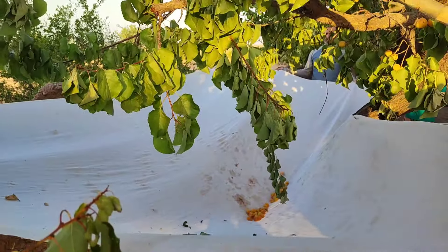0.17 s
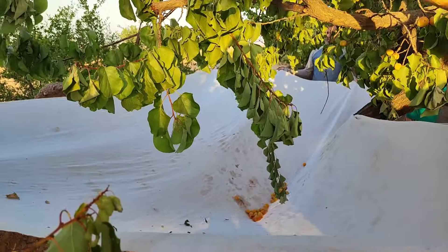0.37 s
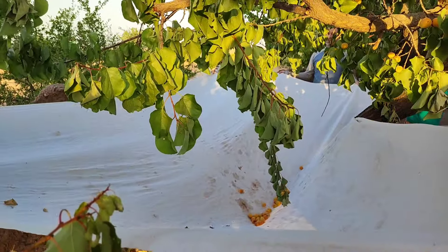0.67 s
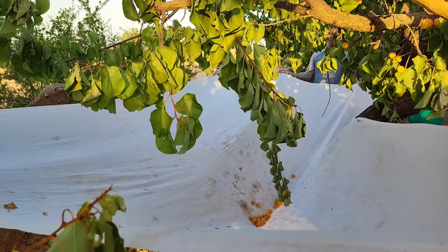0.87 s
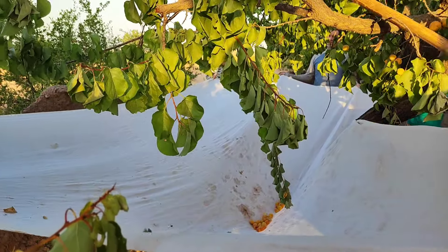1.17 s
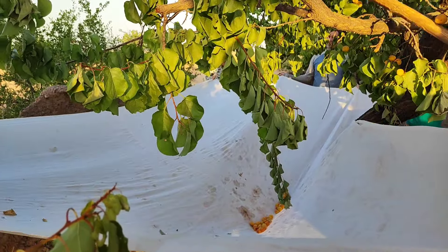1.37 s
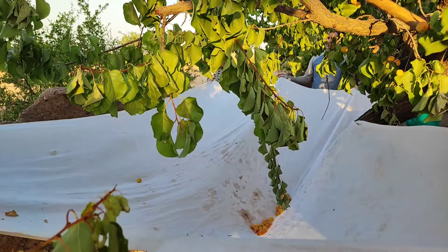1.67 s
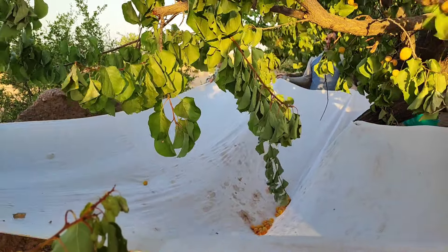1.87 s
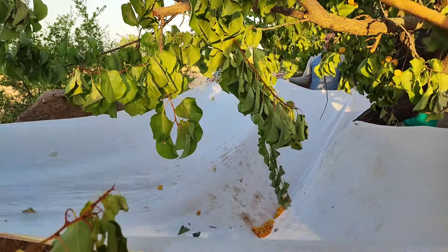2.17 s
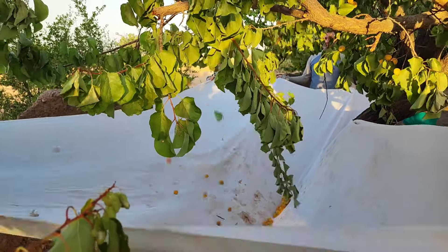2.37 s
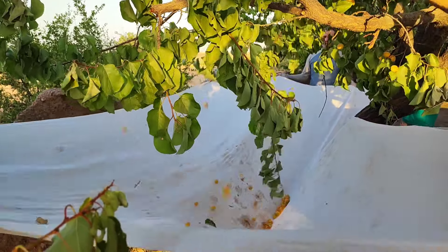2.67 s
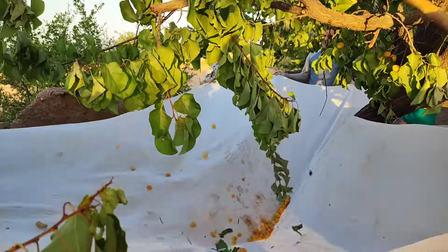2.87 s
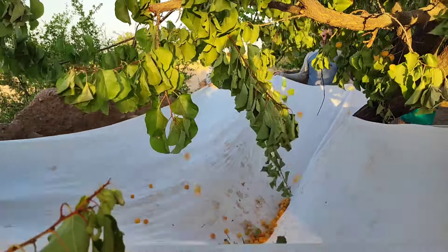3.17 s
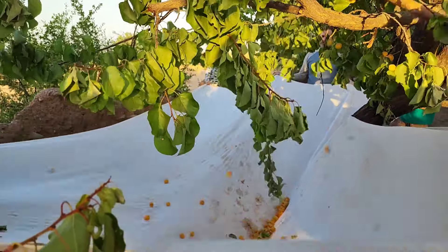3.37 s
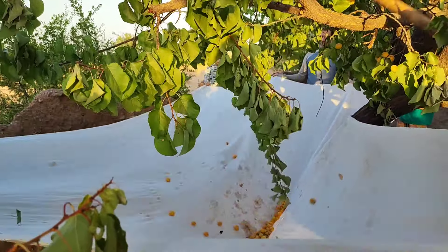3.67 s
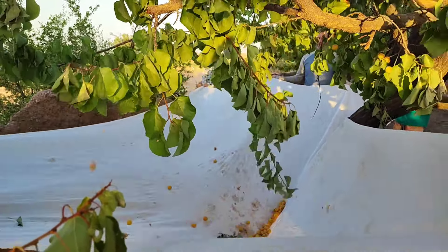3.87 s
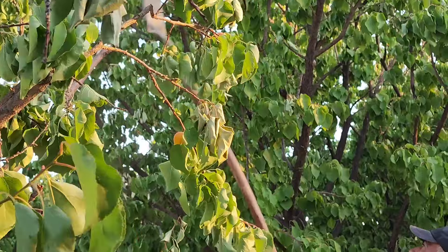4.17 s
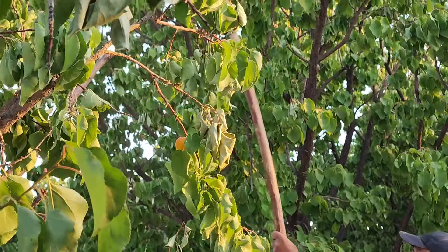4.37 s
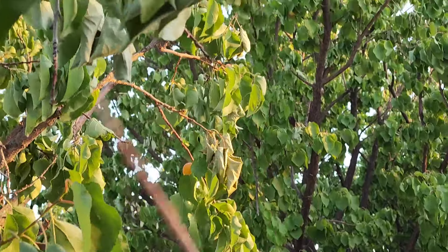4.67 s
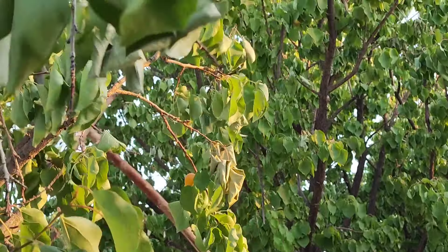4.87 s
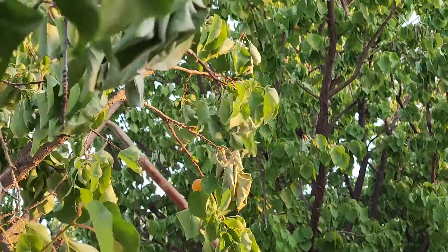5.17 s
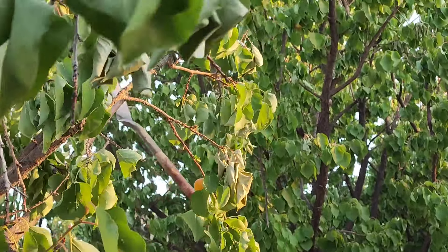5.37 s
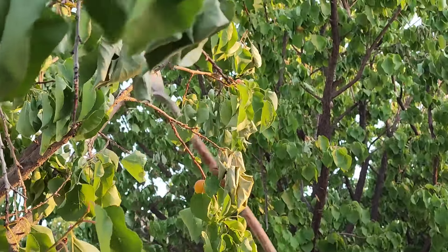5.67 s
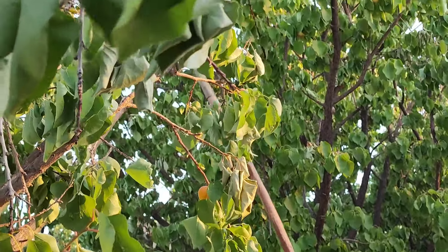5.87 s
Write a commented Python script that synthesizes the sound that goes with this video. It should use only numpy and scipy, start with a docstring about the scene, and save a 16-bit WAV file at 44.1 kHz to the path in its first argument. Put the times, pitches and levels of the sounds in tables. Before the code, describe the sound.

A quiet orchard with a faint far hush and settling leaves, heard from beneath a tree. In the first 0.9 s a small twig snap and a few soft fruit pats land on slack plastic. Around 1.0 s a metal-tipped pole taps lightly twice; a moderate crack comes at 1.8 s, then a quick cluster of light ringing taps from 2.0 to 2.35 s. Hard double knocks, bright crack and dull woody thud with short metallic ring, follow at 2.6, 3.0, 3.4 and 3.75 s, leaves hissing, twigs snapping, fruit pattering. A tiny silence falls at 3.9 s. Then, close among leaves, a sharp twig snap and hollow case bump at 4.2 s, faint fruit pats near 4.5 s and one heavy, strongly ringing knock at 4.8 s. A dry snap follows at 5.0 s; rustle fades while low wind thumps, mostly left, peak around 5.3 and 5.6 s.

```python
"""An orchard in a light wind: fruit is knocked from a tree with a long metal-tipped pole.
Each blow grazes the twigs, cracks on a branch and knocks home; between blows the pole taps lightly.
Contacts are bursts of coloured noise with decaying sine modes for the pole. Every one shakes the leaves,
a hiss with ticks; twigs snap and fruit pats on a plastic sheet, both as short noise bursts.
After a short silence the microphone is up among the leaves, where it is bumped and catches the wind."""
import sys
import numpy as np
from scipy import signal
from scipy.fft import rfft, irfft
from scipy.io import wavfile

SR = 44100
rng = np.random.default_rng(int(sys.argv[2]) if len(sys.argv) > 2 else 0)


def generate_wav(sig):
    """Save sig (samples, or channels by samples) to the path in sys.argv[1] as 16-bit PCM at SR."""
    pcm = np.round(np.clip(np.atleast_2d(sig).T, -1, 1) * 32767).astype(np.int16)
    wavfile.write(sys.argv[1], SR, pcm)


N = 266011
TIME, HZ = np.arange(N) / SR, np.fft.rfftfreq(N, 1 / SR)
# below the tree until the silence starts, up in the crown once it ends
SILENCE_START_S, SILENCE_END_S = 3.893, 3.94

# Full blows of the pole on a branch:
# [crack t/s, graze lead/s, knock delay/s, crack level/dB, chatter t60/s, knock level/dB, ring level/dB,
#  mode favoured by the point of contact f/Hz, its boost/dB, leaves level/dB]
FULL_BLOWS = [(1.779, 0.021, 0.012, -18, 0.035, -20, -36, 810, 15.5, -36),
              (2.602, .017, .023, -15, 0.22, -11.5, -25.5, 1480, 2, -25),
              (2.9974, 0.0055, 0.011, -5, 0.062, -9, -25, 1147, 6.5, -26.5),
              (3.376, 0.005, 0.011, -6, 0.045, -9.5, -29.5, 1597, 15, -27),
              (3.763, 0.000896, .0112, -9, 0.067, -10, -23.5, 1746, 1.5, -29),
              (4.7958, 0.00073, 0.015, -16.5, 0.36, -8, -29, 1890, 37, -22.5)]
# Light taps of the pole: [t/s, crack level/dB, ring level/dB, favoured mode f/Hz, its boost/dB]
LIGHT_TAPS = [(-.25, -45, -37, 1510, 10.5), (0.9682, -22, -30, 2648, 16), (1.023, -28, -34, 1510, 1),
              (1.964, -28, -39, 1650, 16.5), (2.048, -32.5, -36.5, 800, 12.5),
              (2.0584, -26, -29.5, 1653, 18), (2.1422, -25.5, -25, 1650, 19), (2.205, -20.5, -42, 1700, 13),
              (2.222, -16.5, -28.5, 1600, 6), (2.238, -21, -38.5, 1690, 12),
              (2.3443, -26.5, -32.5, 2700, 1)]
REBOUND_DB, REBOUND_T60_S = -9.5, 0.12  # second crack as the pole knocks home, against the first
CRACK_BODY_DB, CRACK_BODY_T60_S = -12.5, 0.079  # dull share of a blow's crack, against its bright part
CRACK_RING_DB = -0.5  # ring of the crack, against that of the knock
KNOCK_T60_S = 0.072
TAP_BODY_DB, TAP_T60_S = -13, 0.13  # dull share of a tap, against its crack; decay of both
TAP_FREE_DB = 2  # a tap leaves the pole free, so its low modes ring more than under a full blow


def pole():
    """A blow grazes the twigs, cracks on the bark and a moment later knocks home; a tap only cracks and rings."""
    out = np.zeros((2, N))
    for s, lead, delay, crack_db, chatter, knock_db, ring_db, favoured_hz, boost_db, _ in FULL_BLOWS:
        add(out, s - lead, graze(crack_db))
        add(out, *contact(s, crack_db, chatter, crack_db + CRACK_BODY_DB, CRACK_BODY_T60_S,
                          ring_db + CRACK_RING_DB, favoured_hz, boost_db))
        add(out, *contact(s + delay, crack_db + REBOUND_DB, REBOUND_T60_S, knock_db, KNOCK_T60_S,
                          ring_db, favoured_hz, boost_db))
    for s, crack_db, ring_db, favoured_hz, boost_db in LIGHT_TAPS:
        add(out, *contact(s, crack_db, TAP_T60_S, crack_db + TAP_BODY_DB, TAP_T60_S,
                          ring_db, favoured_hz, boost_db, TAP_FREE_DB))
    return out


# Spectrum of the bright crack on bark: [f/Hz, relative level/dB per Hz]
CRACK_SPECTRUM = [(300, -44), (900, -14), (1600, 3.5), (3000, 4), (6000, 1.5), (7300, -10), (9000, -7),
                  (11000, -16), (16000, -15)]
# Spectrum of the dull knock: [f/Hz, relative level/dB per Hz]
KNOCK_SPECTRUM = [(50, -30.5), (180, -6.5), (280, -6.5), (480, -3.5), (630, -10.5), (820, -7), (1400, 0.5),
                  (2500, -10), (6000, -53.5)]


def graze(crack_db, graze_db=-9.5, body_db=-5, t60=0.064, rise=0.003):
    """The pole brushes the twigs: a bright and a dull clatter, set against the level of the crack."""
    bright = burst(spectrum(CRACK_SPECTRUM), t60, rise)
    dull = burst(spectrum(KNOCK_SPECTRUM), t60, rise)
    return amp(crack_db + graze_db) * (bright + amp(body_db) * dull)


def contact(s, crack_db, chatter, knock_db, knock_t60, ring_db, favoured_hz, boost_db, free_db=0, damp_db=6.5):
    """One touch of pole and branch: a bright crack, a dull knock and a ring that later touches damp."""
    # the pole is a little to the right before the silence and to the left after it
    if s < SILENCE_START_S:
        end, lag = SILENCE_START_S, -0.00006
    else:
        end, lag = N / SR, 0.00016
    ring = pole_ring(knock_db + free_db, ring_db, favoured_hz, boost_db, end - s, lag)
    starts = np.sort([row[0] for row in FULL_BLOWS + LIGHT_TAPS])
    later = starts[starts > s + 0.07]
    touches = np.searchsorted(later, s + np.arange(ring.shape[1]) / SR)
    out = ring * amp(-damp_db * touches)
    add(out, 0, amp(crack_db) * burst(spectrum(CRACK_SPECTRUM), chatter, rise=0.00046, lag=lag))
    add(out, 0, amp(knock_db) * burst(spectrum(KNOCK_SPECTRUM), knock_t60, rise=0.00096, lag=lag))
    return s, out


# Modes of the pole: [f/Hz before detuning, relative level/dB, t60/s]
POLE_MODES = [(194, -8.5, 0.13), (410, 2.5, 0.021), (505, 3, 0.064), (735, 0, 0.073), (799, 2.5, 0.12),
              (872, 8.5, 0.041), (1020, -37, 0.025), (1133, -19, 0.73), (1320, -28.5, .08),
              (1510, -3.5, 0.48), (1509, -15.5, 2.2), (1603, -0.5, 0.11), (1659, -11, 0.92),
              (1707.5, 4.5, 0.16), (1690, -39.5, 0.24), (1917, -21.5, 0.75), (1830, -3.5, 0.23),
              (2125, -7, .1), (2370, -10.5, 0.16), (2710, -11, 0.51), (2700, 8.5, 0.04), (3210, -10, 0.15),
              (3470, -27.5, 0.087), (3280, -30, 0.25), (3675, -5.5, 0.25), (4800, -35.5, 0.27),
              (4750, -2.5, 0.16), (5220, 2, 0.11), (5840, -6.5, 0.11), (6100, -31.5, 0.29)]


def pole_ring(knock_db, ring_db, favoured_hz, boost_db, seconds, lag):
    """The pole's modes as decaying sines; the low ones follow the weight of the knock."""
    hz, db, t60 = np.transpose(POLE_MODES)
    heavy = np.clip(read([(600, 0.9), (1450, 0.0062)], hz), 0, 1)
    favour = boost_db * np.exp(-((hz - favoured_hz) / 35) ** 2)
    db = db + heavy * (knock_db - 8.5) + (1 - heavy) * ring_db + favour
    phase = rng.uniform(0, 2 * np.pi, len(hz))
    scatter, grip = rng.standard_normal((2, len(hz)))
    hz = hz * (1 + 0.00073 * grip / t60)  # grip and branch detune the modes that they damp most
    apart = 2 * np.pi * hz * lag + scatter * hz / 3000  # the ports hear high modes out of step
    t = np.arange(int(seconds * SR)) / SR
    out = np.zeros((2, len(t)))
    for f, gain, life, p, d in zip(hz, amp(db), t60, phase, apart):
        u = t[:int(life * SR)]
        both_phases = np.array([[p], [p - d]])
        out[:, :len(u)] += gain * fall(u, life, 0.0012) * np.sin(2 * np.pi * f * u + both_phases)
    return out


# Fruit landing on the sheet at set times: [t/s, level/dB, centre f/Hz]
SET_FRUIT = [(.175, -40.5, 785), (0.279, -40, 490), (0.629, -40, 900), (.941, -36, 614), (2.837, -23, 940),
             (3.22, -34.5, 1120), (3.851, -22.5, 750), (4.446, -37, 1100), (4.517, -42, 700)]
FALL_S = 0.31  # from branch to sheet
FURTHER_FRUIT_PER_S, FURTHER_FRUIT_DB = 6.2, 3.5  # random fruit, against the rustle that loosened it


def fruit(shake, crinkle_db=-13, further_hz=750, pat_t60=0.08):
    """Fruit pats and crinkles the slack sheet; after the first full blow more lands at random, loud as its rustle."""
    out = np.zeros((2, N))
    landings = [(s, amp(db), hz) for s, db, hz in SET_FRUIT]
    for s in chance(FURTHER_FRUIT_PER_S):
        loosened = s - FALL_S
        if FULL_BLOWS[0][0] < loosened and s < SILENCE_START_S:
            landings.append((s, amp(FURTHER_FRUIT_DB) * np.interp(loosened, TIME, shake), further_hz))
    for s, gain, centre_hz in landings:
        add(out, s, gain * burst(lambda hz: hump(hz, centre_hz, 7), pat_t60, rise=0.0018))
        add(out, s, gain * amp(crinkle_db) * burst(spectrum(LEAF_SPECTRUM), pat_t60, rise=0.00084))
    return out


# Twigs snapping and sprigs brushing at set times: [t/s, level/dB, centre f/Hz, t60/s]
SET_TWIGS = [(.1252, -27.5, 2730, 0.018), (.390, -36.5, 3300, .03), (.418, -34, 6500, .048),
             (1.5165, -35, 1900, 0.024), (2.7987, -18.5, 6700, 0.026), (2.836, -23, 5500, .044),
             (4.146, -29.5, 7850, 0.18), (4.2084, -18, 6950, 0.027), (4.649, -33, 5030, .024),
             (4.693, -30.5, 3450, 0.037), (4.9908, -17, 6000, 0.017), (5.608, -29.5, 5940, 0.044),
             (5.919, -34, 4970, .022), (6.003, -38.5, 6200, 0.086)]
FLICKS_PER_S, FLICK_DB = 3.3, 14  # random flicks of stalks and leaves, against the rustle


def twigs(shake, flick_hz=4800, flick_t60=0.025):
    """Dry snaps, the foliage's colour tilted to a pitch; stalks and leaves flick at random, louder in strong rustle."""
    out = np.zeros((2, N))
    snaps = [(s, amp(db), hz, t60) for s, db, hz, t60 in SET_TWIGS]
    for s in chance(FLICKS_PER_S):
        gain = amp(FLICK_DB) * np.interp(s, TIME, shake)
        snaps.append((s, gain, flick_hz * 2 ** rng.uniform(-1, 1), flick_t60))
    for s, gain, centre_hz, t60 in snaps:
        add(out, s, gain * burst(lambda hz: read(LEAF_SPECTRUM, hz) + hump(hz, centre_hz, 8.6), t60, rise=0.00069))
    return out


# Spectrum of the foliage: [f/Hz, relative level/dB per Hz]
LEAF_SPECTRUM = [(180, -9), (300, -15), (630, -14), (1120, -14.5), (1220, -11.5), (1420, -13),
                 (1490, -10.5), (1750, -9), (5750, -4), (7620, -14.5), (15500, -21.5)]


def leaves(shake, grains_per_s=900, spread_db=1.5, grain_db=-3, flutter_db=1.0, clump_db=2.5):
    """Leaves brush together after each shake and settle; the nearer ones tick out of the hiss in clumps."""
    sizes_db = spread_db * np.minimum(rng.exponential(1, (2, N)), 5) + clump_db * waver(90)
    sizes = amp(sizes_db) * rng.choice([-1, 1], (2, N))
    ticks = unit(sizes * (rng.random((2, N)) < grains_per_s / SR))
    hiss = rng.standard_normal((2, N))
    rustle = colour(hiss + amp(grain_db) * ticks, spectrum(LEAF_SPECTRUM))
    return rustle * shake * amp(flutter_db * waver(65))


# The pole pushes through the foliage between blows: [t/s, rustle level/dB, t60/s]
POLE_SWINGS = [(-.05, -35, 1.56), (.59, -37, 0.65), (.923, -30.5, 0.29), (1.712, -34, 4.6),
               (3.95, -44.5, 11.9)]
SWING_RISE_S = 0.061  # a swing gathers leaves slightly more slowly than a blow
SHAKE_RISE_S, SETTLE_T60_S = 0.06, 1.355  # shaken leaves swell and settle
SWAY_DB, SWAY_T60_S = -11.5, 3  # the swaying branch keeps a few of them moving
TAP_SHAKE_DB = -13.5  # rustle that a tap starts, against its crack


def shaking():
    """Strength of the rustle over time: every blow, tap and swing sets leaves moving, and their powers add."""
    jolts = [(row[0], row[-1]) for row in FULL_BLOWS]
    jolts += [(s, db + TAP_SHAKE_DB) for s, db, *_ in LIGHT_TAPS]
    shakes = [(s, db, t60, SWING_RISE_S) for s, db, t60 in POLE_SWINGS]
    shakes += [(s, db, SETTLE_T60_S, SHAKE_RISE_S) for s, db in jolts]
    shakes += [(s, db + SWAY_DB, SWAY_T60_S, SHAKE_RISE_S) for s, db in jolts]
    t = TIME[::64]
    power = np.zeros(len(t))
    for s, db, t60, rise in shakes:
        heard = (t < SILENCE_END_S) | (s > SILENCE_START_S)  # earlier shakes do not carry on up in the crown
        power += heard * (amp(db) * fall(np.maximum(t - s, 0), t60, rise)) ** 2
    return np.interp(TIME, t, np.sqrt(power))


# Bumps on the microphone's case: [t/s, level/dB]
CASE_BUMPS = [(4.193, -15.5), (4.2164, -6), (4.243, -19.5), (4.283, -26.5)]
# Modes of the case: [f/Hz, relative level/dB, t60/s]
CASE_MODES = [(445, 11.5, 0.033), (362.8, -2.5, 0.13), (553, -6.5, 0.081), (223, -15.5, 0.12)]


def bumps(scrape_db=-22, size=16384):
    """Something brushes the case, which gives a hollow bonk and a little scrape."""
    out, t = np.zeros((2, N)), np.arange(size) / SR
    port_phase = np.array([[0], [0.8]])
    bonk = sum(amp(db) * fall(t, t60, 0.0097) * np.sin(2 * np.pi * hz * t - port_phase)
               for hz, db, t60 in CASE_MODES)
    for s, db in CASE_BUMPS:
        scrape = burst(lambda hz: hump(hz, 190, 5.4), t60=0.29, rise=0.00039)
        add(out, s, amp(db) * (bonk + amp(scrape_db) * scrape))
    return out


# Spectrum of the wind on the microphone: [f/Hz, relative level/dB per Hz]
WIND_SPECTRUM = [(15, -8.5), (40, 3), (100, -0.5), (190, -12.5), (350, -29.5), (1000, -60.5), (4000, -100)]
# Wind in shelter below the tree: [t/s, level/dB before below_db and the lumps]
SHELTERED_BREEZE = [(0.05, -57.5), (0.7, -72), (3.0, -51.5), (3.7, -65)]
# Wind up in the crown: [t/s, level/dB before crown_db and the lumps]
CROWN_BREEZE = [(3.98, -62), (4.12, -43), (5.35, -39), (5.48, -44), (5.6, -33), (5.87, -52), (6.03, -42.5)]
# Eddies at set times, thumping mostly the left port: [t/s, level/dB at the left port, centre f/Hz]
SET_EDDIES = [(4.393, -28.5, 108), (4.573, -30.5, 141), (5.124, -27, 114), (5.312, -20.5, 71),
              (5.605, -19, 77.5), (5.704, -31.5, 170)]


def wind(below_db=1, crown_db=3, lumps_db=4.5, right_db=-10):
    """Eddies buffet the ports, mostly the left one, as lumpy low noise with a few thumps."""
    noise = rng.standard_normal((2, N))
    eddies = unit(irfft(rfft(noise) * amp(read(WIND_SPECTRUM, HZ)), N))
    lumps = lumps_db * np.array([waver(65), waver(45)])
    below = np.interp(TIME, *np.transpose(SHELTERED_BREEZE)) + below_db
    crown = np.interp(TIME, *np.transpose(CROWN_BREEZE)) + crown_db
    flow = eddies * amp(np.where(TIME < SILENCE_END_S, below, crown) + lumps)
    for s, db, centre_hz in SET_EDDIES:
        add(flow, s, amp(db) * burst(lambda hz: hump(hz, centre_hz, 21.4), t60=0.11, rise=0.0017))
    return flow * amp([[0], [right_db]])


# Spectrum of the far hush: [f/Hz, relative level/dB per Hz]
AIR_SPECTRUM = [(30, 4), (150, -11.5), (500, -8.5), (1500, -12), (5000, -10), (8000, -20), (16000, -20)]


def far_hush(level_db=-56):
    """The far hush of the orchard: steady coloured noise."""
    return amp(level_db) * colour(rng.standard_normal((2, N)), spectrum(AIR_SPECTRUM))


def orchard(x, wet_db=-17, t60=0.23, echoes_per_s=2000):
    """Trunks and ground scatter a thin, short echo."""
    t = np.arange(SR // 2) / SR
    sparse = rng.random((2, len(t))) < echoes_per_s / SR
    echoes = rng.standard_normal((2, len(t))) * sparse * fall(t, t60, 0.0026)
    echoes = echoes / np.linalg.norm(echoes[0])
    return x + amp(wet_db) * signal.fftconvolve(x, echoes, axes=1)[:, :N]


def burst(shape_db, t60, rise, lag=0, size=16384):
    """A dying clatter of tiny contacts: coloured noise under a decay."""
    return colour(rng.standard_normal((2, size)), shape_db, lag) * fall(np.arange(size) / SR, t60, rise)


# Likeness of the sound at the two microphone ports: [f/Hz, likeness, clipped to 0-1 in use]
PORT_LIKENESS = [(150, 1.63), (800, 0.53), (1600, 0.24), (3000, -0.16), (5000, -0.19), (8000, -0.19)]


def colour(x, shape_db, lag=0):
    """Gives two unrelated noises a spectrum, the likeness of the two ports and the lag of the right one."""
    hz, z = np.fft.rfftfreq(x.shape[1], 1 / SR), rfft(x)
    same = np.clip(read(PORT_LIKENESS, hz), 0, 1)
    right = same * z[0] + np.sqrt(1 - same ** 2) * z[1]
    z[1] = right * np.exp(-2j * np.pi * hz * lag)
    return unit(irfft(z * amp(shape_db(hz)), x.shape[1]))


def hump(hz, centre_hz, slope_db):
    """A broad resonance, in dB, whose skirts fall by slope_db an octave."""
    return -slope_db * (np.hypot(np.log2((hz + 1) / centre_hz), 0.5) - 0.5)


def spectrum(points):
    """Turns a table of levels into a function of frequency."""
    return lambda hz: read(points, hz)


def read(points, hz):
    """Reads a table on a log-frequency axis."""
    f, value = np.transpose(points)
    return np.interp(np.log(hz + 1), np.log(f), value)


def fall(t, t60, rise):
    """A quick rise and an exponential decay."""
    return (1 - np.exp(-t / rise)) * amp(-60 * t / t60)


def waver(rate):
    """Slow random motion of rms 1, through rate random points a second."""
    knots = rng.standard_normal(4096)
    return unit(np.interp(TIME * rate, np.arange(len(knots)), knots))


def chance(per_s, count=80):
    """Random moments through the scene, on average per_s of them a second."""
    times = np.cumsum(rng.exponential(1, count)) / per_s
    return times[times < N / SR]


def amp(db):
    """Decibels to gain."""
    return 10 ** (np.asarray(db) / 20)


def unit(x):
    """Scales to rms 1."""
    return x / np.sqrt(np.mean(x ** 2) + 1e-20)


def add(mix, s, sound):
    """Mixes a stereo sound in at time s, cutting what falls outside."""
    start = round(s * SR)
    sound = sound[:, max(-start, 0):]
    part = mix[:, max(start, 0):][:, :sound.shape[1]]
    part += sound[:, :part.shape[1]]


def scene():
    """Pole, fruit and twigs echo in the orchard, with leaves, bumps, wind and the far hush."""
    shake = shaking()
    echoing = orchard(pole() + fruit(shake) + twigs(shake))
    return echoing + leaves(shake) + bumps() + wind() + far_hush()


# Balance of the two microphone ports: [f/Hz, left minus right level/dB]
PORT_BALANCE = [(150, 0), (1600, -1), (3000, -1.5), (5000, -6.5), (7000, -0.5), (9000, 1), (15000, -1.5)]


def record(dry, edge_hz=15900):
    """Port colour, the brief silence, overload and the band limit."""
    balance_db = np.array([[0.5], [-0.5]]) * read(PORT_BALANCE, HZ)
    x = irfft(rfft(dry) * amp(balance_db), N)
    corners = [SILENCE_START_S - 0.002, SILENCE_START_S, SILENCE_END_S, SILENCE_END_S + 0.05]
    gate = np.interp(TIME, corners, [1, 0, 0, 1])
    low_pass = signal.firwin(511, edge_hz, window=("kaiser", 9), fs=SR)
    return signal.oaconvolve(np.clip(x * gate, -1, 1), low_pass[None], "same")


dry = scene()
out = record(dry)
generate_wav(out)
```